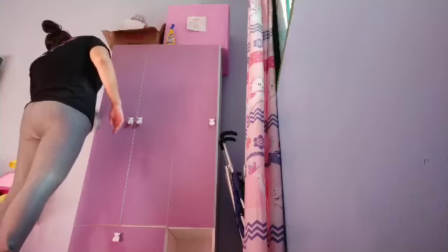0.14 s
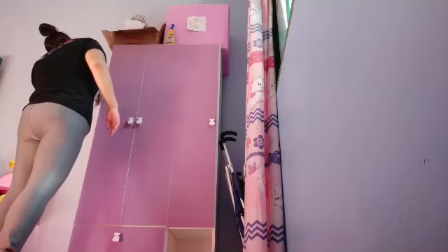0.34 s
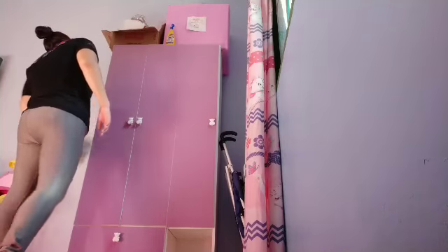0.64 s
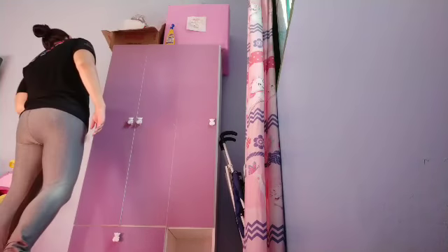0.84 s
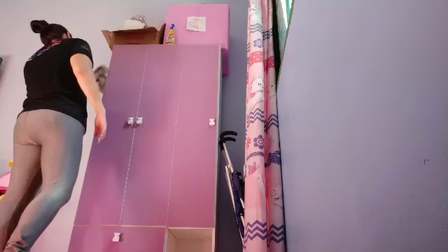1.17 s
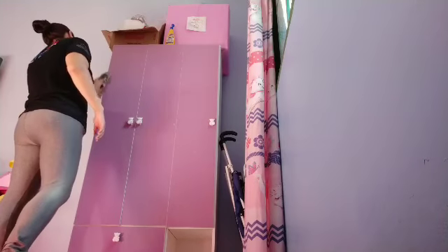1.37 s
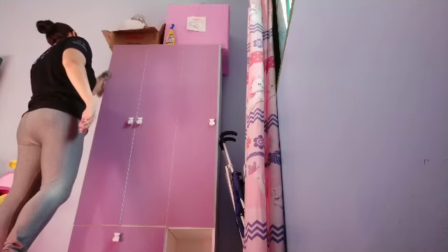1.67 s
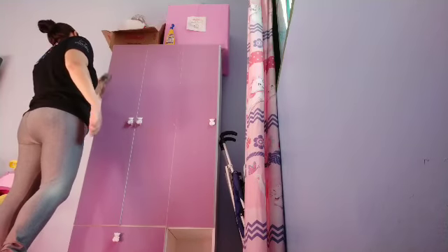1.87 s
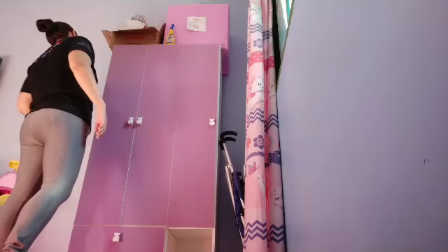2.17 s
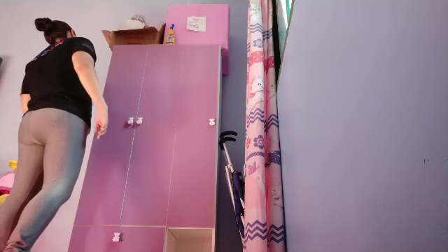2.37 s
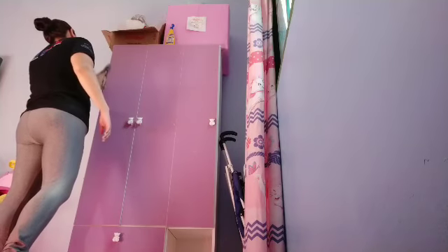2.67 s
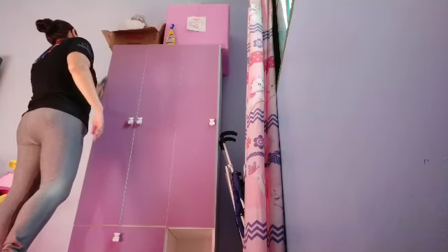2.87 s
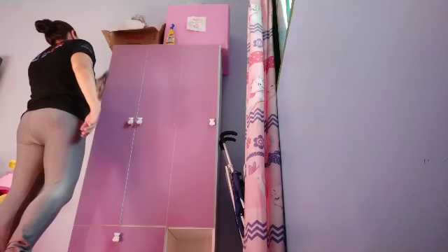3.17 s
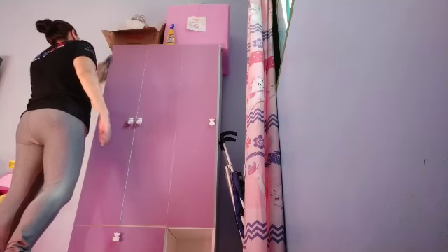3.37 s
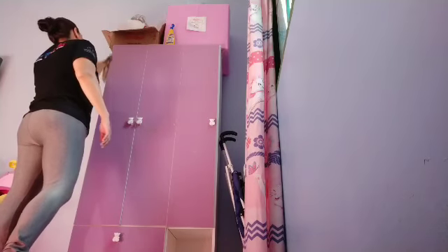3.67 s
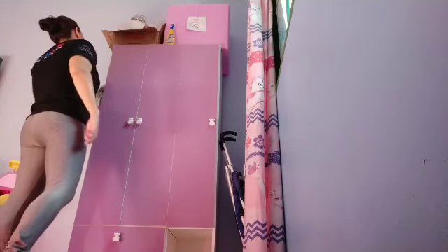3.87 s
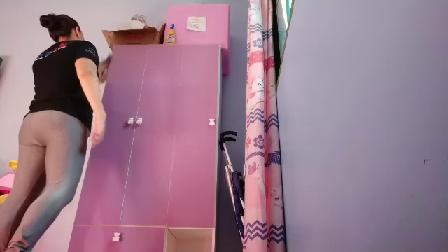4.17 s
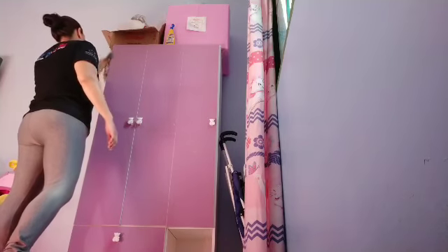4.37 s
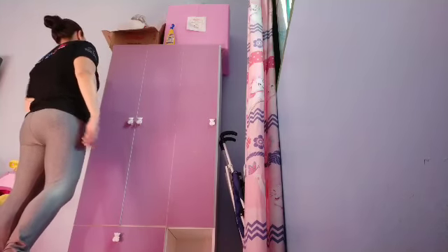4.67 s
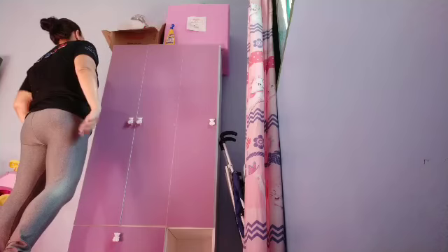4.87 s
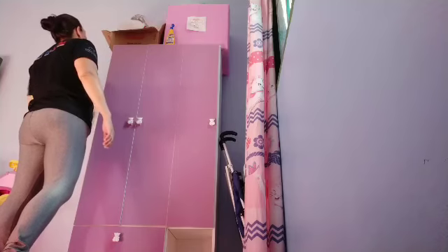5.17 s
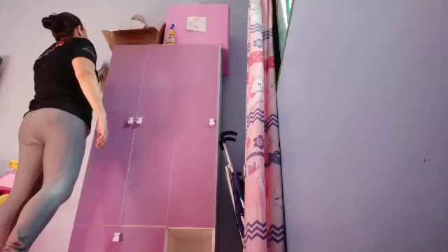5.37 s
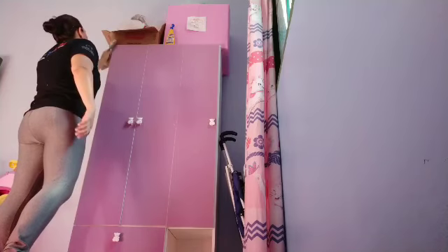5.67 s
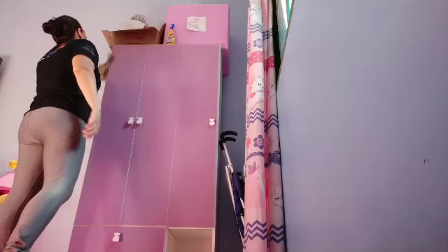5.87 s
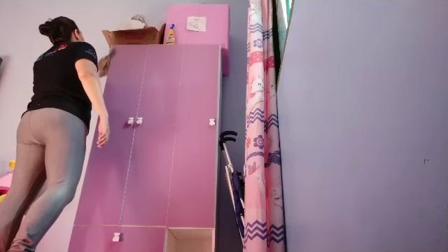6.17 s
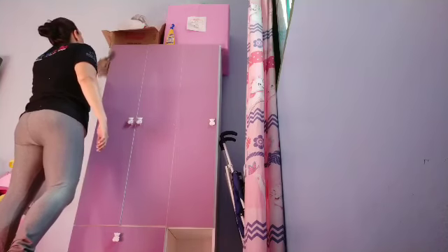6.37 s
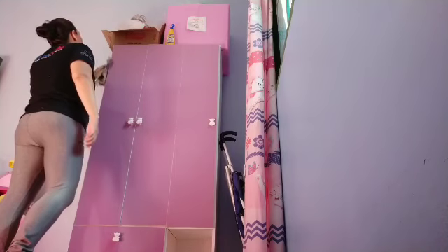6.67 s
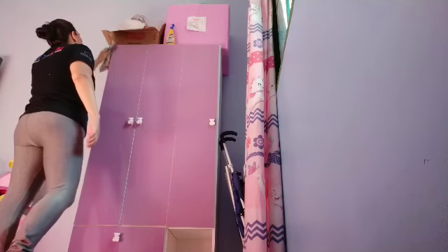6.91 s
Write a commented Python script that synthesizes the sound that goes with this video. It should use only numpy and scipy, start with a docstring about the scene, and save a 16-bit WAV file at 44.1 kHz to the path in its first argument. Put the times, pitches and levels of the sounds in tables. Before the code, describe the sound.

A cloth wipes to and fro over a wooden wardrobe panel, hissing and scraping in short strokes, with two dull hollow thumps in a quiet room.

```python
"""A cloth is wiped to and fro over the side of a wooden wardrobe in a small room.
Its fibres hiss and scrape (patchy filtered noise), its weave rasps, and the thin panel drums under it.
The hand bumps the panel, twice heavily, and gripping cloth judders it: force pulses ring its modes.
Still air, a deep rumble and a faint hum lie beneath. Two microphone ports each add a treble ring."""
import sys
import numpy as np
from scipy import signal
from scipy.fft import rfft, irfft
from scipy.io import wavfile
from scipy.ndimage import uniform_filter1d

SR = 44100
rng = np.random.default_rng(int(sys.argv[2]) if len(sys.argv) > 2 else 0)


def unload_audio(sound):
    """Save the sound as a 16-bit wav file, at the path given as the first command line argument."""
    columns = np.transpose(np.atleast_2d(sound))
    # keep every value between -1 and 1, then stretch to whole-number steps
    steps = np.round(np.clip(columns, -1, 1) * 32767)
    wavfile.write(sys.argv[1], SR, steps.astype(np.int16))


N = 310452
FREQ, TIME = np.fft.rfftfreq(N, 1 / SR), np.arange(N) / SR

# Strokes of the cloth. Each row: start in seconds, end of the push in seconds, hiss level in dB,
# scrape relative to the hiss in dB, growth over the stroke in dB, drumming of the rubbed spot in dB.
STROKE_TABLE = [(-.08, 0.088, -48, -4, -0.5, 5), (.135, 0.412, -51.4, -3.5, -12, -1.5),
                (0.443, 0.726, -50.5, -4, 6.5, 2.5), (1.256, 1.572, -63.5, -5, 3.5, 7),
                (1.634, 1.83, -53, -5, -7, 4), (1.876, 2.203, -49.5, -4.5, 2.3, 2),
                (2.65, 2.759, -51.5, -1.5, -9, 12.5), (2.82, 3.033, -52, -1.5, 3, -1),
                (3.054, 3.549, -54, -2.5, 1.2, 2), (3.622, 3.905, -51, -2.2, 6.5, 6),
                (3.937, 4.292, -53, -1.5, 2, 7), (4.396, 4.766, -50.5, -1.5, 9.5, 2),
                (5.45, 5.728, -62.5, -2, 7.5, 3.5), (5.78, 6.018, -49.5, -5, -2.5, 1.2),
                (6.068, 6.293, -51.5, -4.8, -1, -1.5), (6.367, 6.583, -48.5, -3.5, -5.5, -0.5),
                (6.64, 6.93, -53.5, -4.5, 0.5, 2.5)]
# Spectrum of the fibres' hiss. Each row: frequency in Hz, relative level in dB.
HISS_SPECTRUM = [(500, -48), (3000, -20), (6000, -5.5), (8500, -0.5), (11000, -1.5), (14000, -13)]
# Spectrum of the scrape. Each row: frequency in Hz, relative level in dB.
SCRAPE_SPECTRUM = [(300, -35), (700, -7), (1100, -4.5), (1500, -5.5), (2000, -1), (2500, 3), (3300, -1),
                   (5000, -5), (7500, -8.5), (10000, -59), (14000, -37)]
# Spectrum of the hollow rub. Each row: frequency in Hz, relative level in dB.
HOLLOW_SPECTRUM = [(120, -35), (240, -3), (290, 0.5), (330, 6.5), (385, -8), (440, 1.5), (600, 1.5),
                   (780, -2.5), (890, 0), (1100, -8), (2000, -2), (6000, -37)]
# Spectrum of the drumming, before the panel's peaks. Each row: frequency in Hz, relative level in dB.
WOOD_SPECTRUM = [(42, -39), (56, 2.5), (72, 1), (100, 3), (135, -8.5), (200, -5.5), (260, -10.5),
                 (330, -14.5), (400, -17), (850, -25.5), (4000, -75)]
# Hard presses that sound hollow. Each row: middle in seconds, half length in seconds, level in dB.
SCUFF_TABLE = [(0.65, 0.067, -57.5), (2.08, 0.023, -54), (2.21, 0.015, -60), (3.925, 0.057, -52.5),
               (4.092, .035, -53), (4.752, 0.031, -47)]
# Gliding rasps of the weave in the firmest strokes. Each row: start in seconds, length in seconds,
# first frequency in Hz, last frequency in Hz, level at the middle in dB.
RASP_TABLE = [(0.574, 0.17, 610, 746, -58.5), (2.88, 0.26, 775, 780, -61.5), (3.12, 0.42, 666, 520, -59),
              (3.692, 0.35, 640, 1050, -57.5), (4.133, 0.21, 846, 860, -53.5),
              (4.475, 0.34, 670, 1600, -60)]
# Spectrum of the still room. Each row: frequency in Hz, relative level in dB.
AIR_SPECTRUM = [(28, -10.5), (44, -21), (64, -8), (120, -20.5), (190, -26), (300, -21), (420, -30.5),
                (850, -31.5), (1200, -36), (3000, -35), (7000, -39), (10000, -44), (14000, -41.5)]
# Spectrum of the deep rumble. Each row: frequency in Hz, relative level in dB.
RUMBLE_SPECTRUM = [(12, -17.5), (22, -23.5), (30, -11.5), (35, -25), (42, -27), (100, -50), (300, -97)]
# Hum partials. Each row: mean frequency in Hz, rms before the swell in dB.
HUM_PARTIALS = [(60, -59), (183, -68.5), (355, -74.5)]
# The hum's one swell. Each row: time in seconds, gain in dB.
HUM_SWELL_CURVE = [(4.6, -11), (5.15, 1.5), (5.45, 2.5), (5.9, -22)]
# Modes of the wardrobe panel. Each row: frequency in Hz, relative level in dB, basic t60 in seconds.
PANEL_MODES = [(70.7, 9, 0.35), (92.2, 3.5, 0.25), (96.3, 18, 0.044), (147.5, 1.5, 0.17), (157.6, -16, 0.7),
               (196.1, 4, 0.17), (254.3, -15.5, 0.35), (285, -15, 0.52), (329, 1.5, 0.14),
               (432.5, -13.5, 0.2), (510, -41, 0.45)]
# Bumps of the hand. Each row: start in seconds, dry peak in dB, contact time in seconds,
# weight of the upper modes in dB, ring time factor.
BUMP_TABLE = [(0.596, -39, 0.0028, -20, 1.6), (1.317, -35, 0.021, 3, 1), (1.634, -37, 0.018, 9, 0.79),
              (2.644, -41, 0.0019, 5, 0.78), (2.691, -18.5, 0.0032, 3.5, 0.88),
              (2.733, -31.5, 0.00073, 6.5, 0.96), (3.03, -37, 0.009, -2, 2.2), (3.158, -42, 0.0058, 3, 2),
              (4.044, -30.5, 0.0076, 3, 1.03), (5.495, -31, 0.0038, -0.5, 0.74),
              (5.521, -19.5, 0.016, 17, 1.14), (6.055, -44, 0.0015, -3, 0.8), (6.127, -47, 0.0041, 24, 1.4),
              (6.349, -45, 0.014, 3, 0.32), (6.677, -34.5, 0.014, -7, 0.88),
              (6.697, -37.5, 0.012, 25.5, 1.7)]
# Grip-and-slip trains. Each row: start in seconds, length in seconds, slips per second, dry rms in dB,
# slip time in seconds, unevenness from 0 to 1, weight of the upper modes in dB.
JUDDER_TABLE = [(4.163, 0.067, 82, -42, 0.00052, 0, 2), (4.638, 0.12, 89, -39, 0.0062, 0.09, -6),
                (4.712, 0.083, 73, -37.5, 0.002, 0.47, 3.5)]
# Sound common to both ports. Each row: frequency in Hz, share from 0 to 1.
AXIAL_SHARE = [(100, 0.96), (200, 1), (300, 0.75), (600, 0.45), (900, 0.53), (1050, 0.91), (2000, 0),
               (3000, 0.88), (5000, 0.05), (8000, 0), (14000, 0.28)]
# Colour of the left port. Each row: frequency in Hz, gain in dB.
LEFT_PORT_COLOUR = [(60, -.5), (330, -1.5), (600, 1), (4000, -1.5), (7500, -1), (8800, 0.5), (10200, 12.5),
                    (11500, 5), (14000, 5)]
# Colour of the right port. Each row: frequency in Hz, gain in dB.
RIGHT_PORT_COLOUR = [(60, .5), (330, 1), (600, 1.5), (4000, -1), (7500, 1), (8800, 11), (10200, 1.5),
                     (11500, -1.5), (14000, 5)]

SPEED_UP_S, GRIP_S = 0.14, 0.19  # the pressure builds a little later than the speed
HISS_FADE_DB_PER_S, SCRAPE_FADE_DB_PER_S = 150, 119  # after the push the hiss dies first
ORDINARY_SCRAPE_DB = -54
# levels at an ordinary scrape, and dB of change per dB of scrape
HOLLOW_DB, HOLLOW_FOLLOWS = -60.5, 0.48
WOOD_DB, WOOD_FOLLOWS = -55.5, 0.61
HOLLOW_DRUMS = 0.23  # dB of hollow rub per dB of drumming
IDLE_RASP_HZ, IDLE_RASP_DB = 860, -12  # faint rasp of every stroke, dB relative to its scrape
PALM_MUTES_HZ, PALM_DB_PER_S = 300, -400  # longer contact mutes the modes above this more
NULL_HZ, NULL_Q = 43.7, 0.93  # the room swallows a band below the panel's lowest mode
PORT_DELAY_S, SPREAD_HZ = 0.000493, 970  # the ports differ in arrival time only above SPREAD_HZ
EDGE_HZ = 14220  # upper band limit


def gain_of(db):
    """Decibels as a gain."""
    return 10 ** (np.asarray(db) / 20)


def evened(x):
    """Scaled to an rms of 1."""
    return x / np.sqrt(np.mean(x ** 2) + 1e-20)


def read(points):
    """A spectrum table interpolated over log frequency."""
    hz, value = np.transpose(points)
    return np.interp(np.log(FREQ + 1), np.log(hz + 1), value)


def read_gain(points):
    """A dB spectrum as gains."""
    return gain_of(read(points))


def follow(points):
    """A curve table at every sample."""
    return np.interp(TIME, *np.transpose(points))


def add(mix, start_s, sound):
    """Mixes a sound in at its time."""
    part = mix[round(start_s * SR):][:len(sound)]
    part += sound[:len(part)]


def wander(rate_hz):
    """Slow random drift of unit rms: low-passed noise."""
    noise = rfft(rng.standard_normal(N))
    return evened(irfft(noise / (1 + (FREQ / rate_hz) ** 4), N))


def field(drive, gain):
    """Four strands of sound: two cross the ports from opposite ends, two reach one port only."""
    from_left, from_right, *diffuse = rfft(drive)
    share = np.clip(read(AXIAL_SHARE), 0, 1)
    late = np.exp(-2j * np.pi * FREQ * PORT_DELAY_S * (FREQ > SPREAD_HZ))
    axial = np.array([from_left + late * from_right, late * from_left + from_right]) / np.sqrt(2)
    ports = np.sqrt(share) * axial + np.sqrt(1 - share) * np.array(diffuse)
    return evened(irfft(gain * ports, N))


def room(x, t60_s, wet_db):
    """Direct sound plus a short tail of sparse wall reflections, partly different at each port."""
    t = np.arange(SR // 2) / SR
    signs = rng.choice([-1., 1.], (3, len(t)))
    taps = signs * (rng.random((3, len(t))) < 2000 / SR)
    decay = gain_of(-60 * t / t60_s) * (t > 0.006)
    tail = (taps[0] + 0.077 * taps[1:]) * decay
    tail /= np.linalg.norm(tail[0])
    return x + gain_of(wet_db) * signal.fftconvolve(np.atleast_2d(x), tail, axes=1)[:, :N]


def stroke(length_s, growth_db, rise_s, fade_db_per_s):
    """One stroke's envelope: it rises, holds while the push grows or eases, and dies away."""
    t = np.arange(round((length_s + 0.7) * SR)) / SR
    rise = np.sin(np.pi / 2 * np.minimum(t / rise_s, 1)) ** 1.34
    growth = growth_db * (np.minimum(t / length_s, 1) - 0.5)
    fade = fade_db_per_s * np.maximum(t - length_s, 0)
    return rise * gain_of(growth - fade)


def effort():
    """Levels of hiss, scrape, hollow rub and drumming: speed drives the first, pressure the others."""
    power = np.zeros((4, N + SR))  # a second of lead, as the first stroke is already under way
    for start, end, db, pressure_db, growth_db, drum_db in STROKE_TABLE:
        length = end - start
        hiss = gain_of(db) * stroke(length, growth_db, SPEED_UP_S, HISS_FADE_DB_PER_S)
        scrape = gain_of(db + pressure_db) * stroke(length, growth_db, GRIP_S, SCRAPE_FADE_DB_PER_S)
        force = scrape / gain_of(ORDINARY_SCRAPE_DB)
        hollow = gain_of(HOLLOW_DB + HOLLOW_DRUMS * drum_db) * force ** HOLLOW_FOLLOWS
        wood = gain_of(WOOD_DB + drum_db) * force ** WOOD_FOLLOWS
        for layer, level in zip(power, (hiss, scrape, hollow, wood)):
            add(layer, 1 + start, level ** 2)
    return np.sqrt(power[:, SR:])


def fibres(snags_per_s, spread_db):
    """Countless tiny snags of uneven size over a smooth sliding noise."""
    size = gain_of(spread_db * np.minimum(rng.exponential(1, (4, N)), 4))
    caught = rng.random((4, N)) < snags_per_s / SR
    snags = size * rng.standard_normal((4, N)) * caught
    return evened(snags) + rng.standard_normal((4, N))


def creased(x, patchy_db):
    """The folds of the cloth shift, so its colour changes from moment to moment."""
    z = signal.stft(x, nperseg=1024)[2]
    patches = uniform_filter1d(rng.standard_normal(z.shape[1:]), size=6, axis=0)  # over frequency
    patches = evened(uniform_filter1d(patches, size=5, axis=1))  # over time
    return signal.istft(z * gain_of(patchy_db * patches), nperseg=1024)[1][:, :N]


def fibre_hiss(level, folds):
    """Sliding fibres: dense fine snags, bright and fairly even."""
    drive = creased(fibres(6000, 0.63), patchy_db=1.86)
    return field(drive, read_gain(HISS_SPECTRUM)) * level * gain_of(-0.14 + 0.45 * folds)


def fibre_scrape(level, folds):
    """Pressed fibres: coarser snags, with level swings as the folds catch."""
    drive = creased(fibres(2500, 1.5), patchy_db=2.5)
    return field(drive, read_gain(SCRAPE_SPECTRUM)) * level * gain_of(3.0 + 1.47 * folds)


def scuffs():
    """Level of the short hard presses, each a bell curve in time."""
    return sum(gain_of(db) * np.exp(-0.5 * ((TIME - middle) / half) ** 2)
               for middle, half, db in SCUFF_TABLE)


def hollow_rub(level, folds):
    """Sparse uneven snags sound hollow on the wood, most of all in the scuffs."""
    drive = creased(fibres(1500, 3.3), patchy_db=2.5)
    pressed = np.hypot(level, scuffs())
    return field(drive, read_gain(HOLLOW_SPECTRUM)) * pressed * gain_of(-0.97 + 1.5 * folds)


def wood_drumming(level, folds):
    """Friction drums on the panel: coarse snags, boosted around each panel mode."""
    peaks = sum(1 / (1 + ((FREQ - hz) * t60 / 0.69) ** 2) for hz, _, t60 in PANEL_MODES)
    gain = read_gain(WOOD_SPECTRUM) * np.sqrt(1.1 + peaks)
    return field(fibres(400, 3.0), gain) * level * gain_of(0.5 * folds)


def resonate(x, hz, width_hz):
    """A resonance of gain 1 that follows the curve hz: shift to zero, low-pass, shift back."""
    turn = np.exp(2j * np.pi * np.cumsum(hz) / SR)
    r = np.exp(-np.pi * width_hz / SR)
    return 2 * (turn * signal.lfilter([(1 - r) ** 2], [1, -2 * r, r * r], x / turn)).real


def rasp(scraping):
    """Threads of the weave catch in loose rhythm: a fuzzy gliding band and its octave."""
    hz = np.full(N, float(IDLE_RASP_HZ))
    level = scraping * gain_of(IDLE_RASP_DB)
    for start, length, first_hz, last_hz, db in RASP_TABLE:
        u = np.clip((TIME - start) / length, 0, 1)
        hz = np.where((u > 0) & (u < 1), first_hz + (last_hz - first_hz) * u, hz)
        level = np.maximum(level, gain_of(db) * np.sqrt(4 * u * (1 - u)))
    catches = rng.standard_normal((4, N))
    octave = gain_of(-16.0) * resonate(catches, 2 * hz, width_hz=1500)
    return field(resonate(catches, hz, width_hz=160) + octave, 1) * level


def wiping():
    """Fibres scrape and hiss as folds catch unevenly; the same friction drums on the panel."""
    hissing, scraping, ringing, drumming = effort()
    folds = wander(25)
    rubbing = fibre_scrape(scraping, folds) + hollow_rub(ringing, folds)
    rubbing = rubbing + wood_drumming(drumming, folds) + rasp(scraping)
    # the near wall colours all but the hiss
    return fibre_hiss(hissing, folds) + room(rubbing, t60_s=0.09, wet_db=-7.0)


def hum_partial(hz, db):
    """A sine whose frequency wavers at random, by 1.2 % rms."""
    wavering_hz = hz * (1 + 0.012 * wander(13.0))
    return gain_of(db) * evened(np.sin(2 * np.pi * np.cumsum(wavering_hz) / SR))


def background():
    """Still air and a deep rumble as shaped noise, with a faint wavering hum."""
    air = field(rng.standard_normal((4, N)), read_gain(AIR_SPECTRUM)) * gain_of(-58.5)
    rumble = field(rng.standard_normal((4, N)), read_gain(RUMBLE_SPECTRUM)) * gain_of(-50.5)
    hum = sum(hum_partial(hz, db) for hz, db in HUM_PARTIALS)
    return air + rumble + hum * gain_of(follow(HUM_SWELL_CURVE))


def panel(upper_db, ring, muted_db=0):
    """The panel's answer to a tap: its modes swell as the blow spreads, neighbours in opposite directions."""
    t = np.arange(SR * 3 // 4) / SR
    modes = np.zeros(len(t))
    for k, (hz, db, t60) in enumerate(PANEL_MODES):
        mode_db = db + upper_db * (hz > 170) + muted_db * (hz > PALM_MUTES_HZ)
        decay = gain_of(mode_db - 60 * t / (t60 * ring))
        modes += (-1) ** k * decay * np.sin(2 * np.pi * hz * t)
    swelling = modes * (1 - np.exp(-t / 0.0055))
    # the deepest swings hardly move the air
    radiation = signal.butter(2, 62, "highpass", fs=SR, output="sos")
    heard = signal.sosfilt(radiation, swelling)
    return signal.lfilter(*signal.iirnotch(NULL_HZ, NULL_Q, SR), heard)


def push(length_s):
    """A soft pulse of force; the longer, the duller."""
    u = np.arange(SR // 20) / SR / (length_s / 5)
    return u ** 2 * np.exp(-u)


def bumps():
    """The padded hand lands on the panel: one force pulse rings the modes."""
    out = np.zeros(N)
    for start, db, contact, upper_db, ring in BUMP_TABLE:
        answer = panel(upper_db, ring, muted_db=PALM_DB_PER_S * contact)
        thud = signal.fftconvolve(push(contact), answer)
        add(out, start, gain_of(db) * thud / abs(thud).max())
    return out


def judders():
    """The cloth grips and slips: short trains of force pulses shake the panel."""
    out = np.zeros(N)
    for start, length, rate, db, slip, uneven, upper_db in JUDDER_TABLE:
        chance = rng.standard_normal((32, 2))
        slips = np.zeros(SR // 4)
        for k, (shift, size) in enumerate(chance[:round(length * rate)]):
            slip_s = max(k + uneven * shift, 0) / rate
            add(slips, slip_s, push(slip) * np.exp(uneven * size))
        shake = signal.fftconvolve(slips, panel(upper_db, ring=0.6))
        add(out, start, gain_of(db) * shake / shake[:round(length * SR)].std())
    return out


def scene():
    """The wiping, the hand's bumps and the cloth's judders over the quiet of the room."""
    knocks = room(bumps() + judders(), t60_s=0.46, wet_db=-13.5)
    return wiping() + knocks + background()


def record(dry):
    """Each port rings at its own treble pitch; then the band limit."""
    colours = np.array([read_gain(LEFT_PORT_COLOUR), read_gain(RIGHT_PORT_COLOUR)])
    coloured = irfft(rfft(dry) * colours, N)
    band_limit = signal.firwin(1023, EDGE_HZ, window=("kaiser", 9), fs=SR)
    return signal.oaconvolve(coloured, band_limit[None], "same")


dry = scene()
out = record(dry)
unload_audio(out)
```